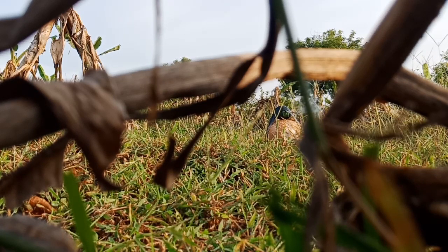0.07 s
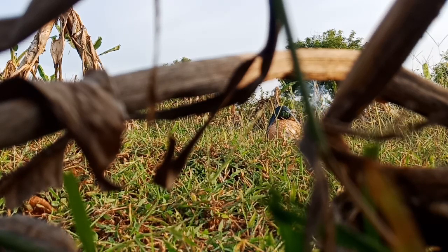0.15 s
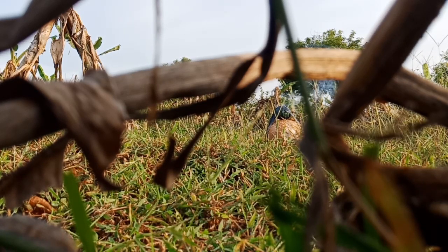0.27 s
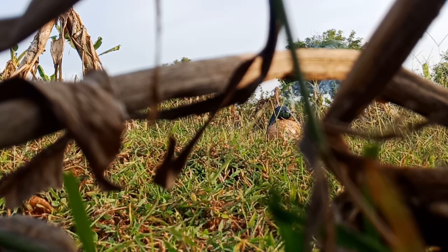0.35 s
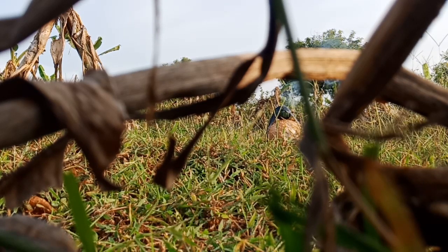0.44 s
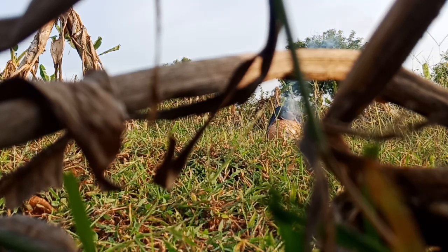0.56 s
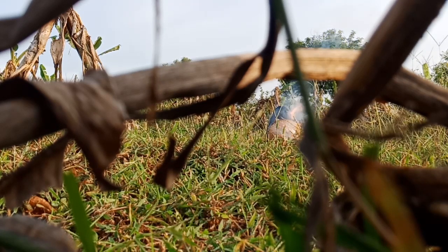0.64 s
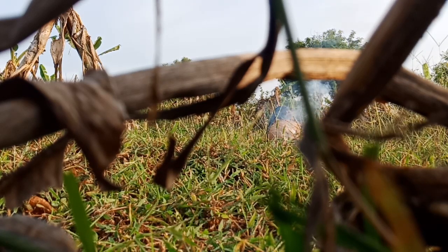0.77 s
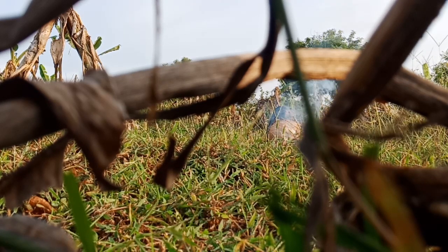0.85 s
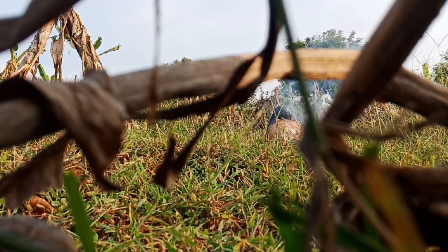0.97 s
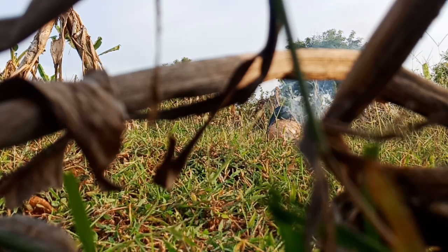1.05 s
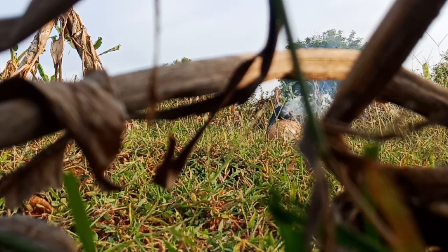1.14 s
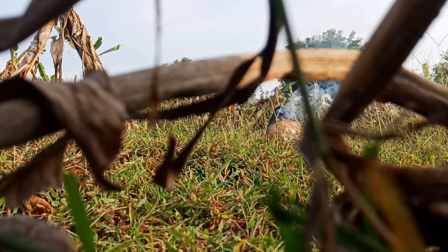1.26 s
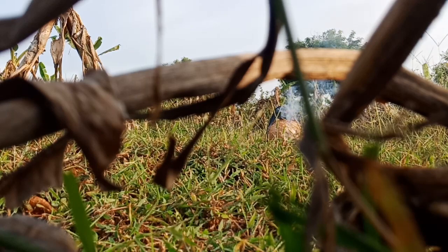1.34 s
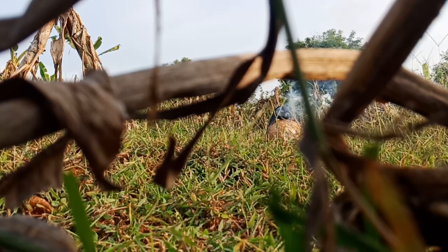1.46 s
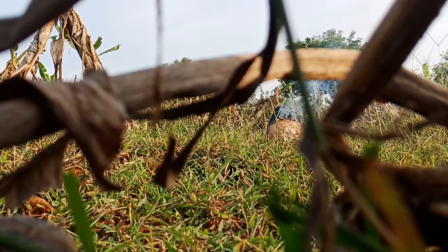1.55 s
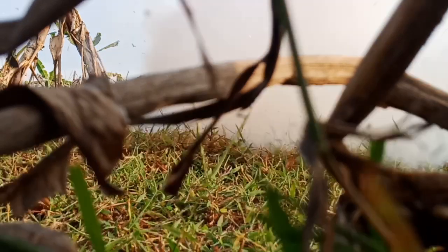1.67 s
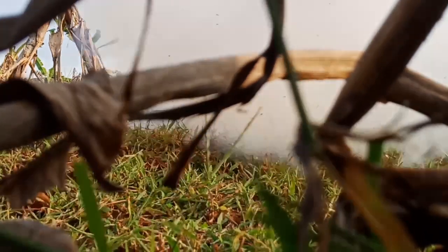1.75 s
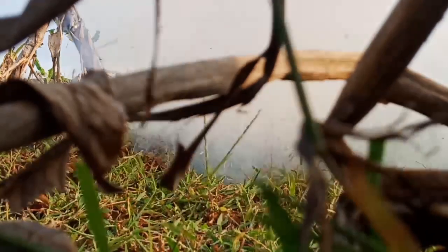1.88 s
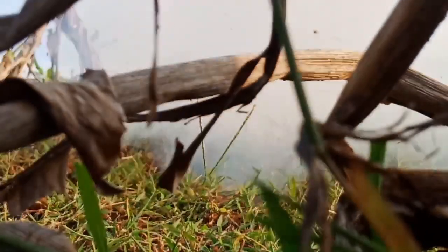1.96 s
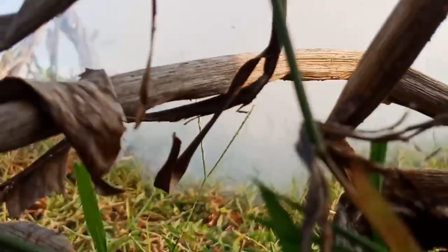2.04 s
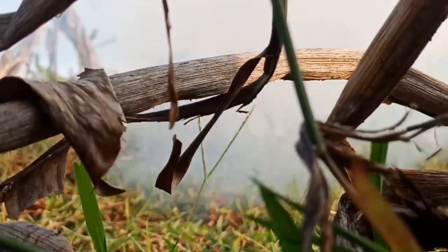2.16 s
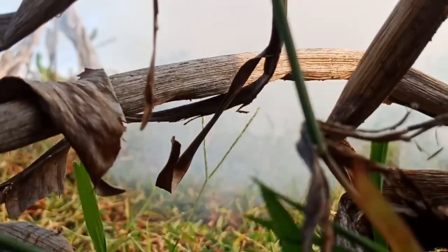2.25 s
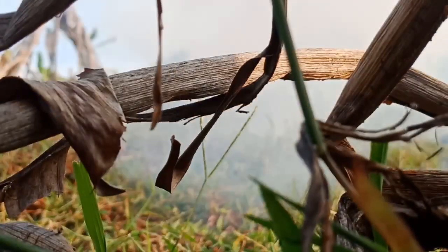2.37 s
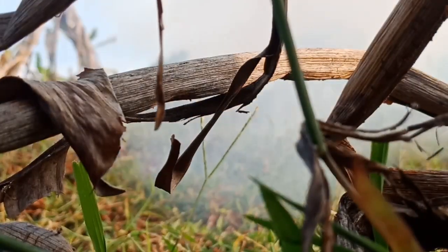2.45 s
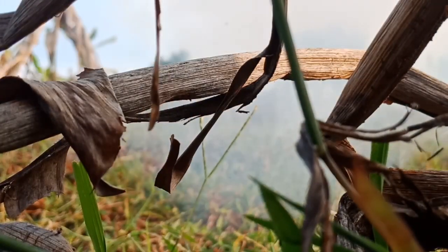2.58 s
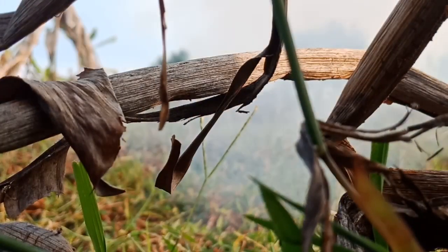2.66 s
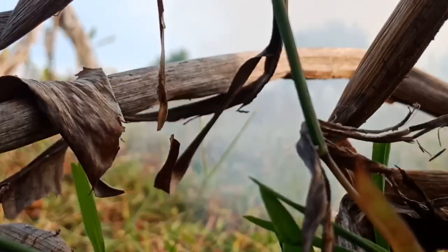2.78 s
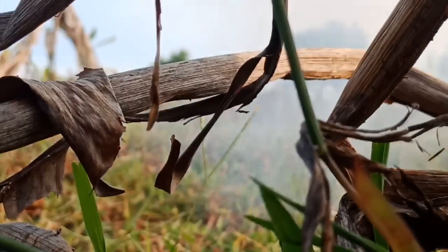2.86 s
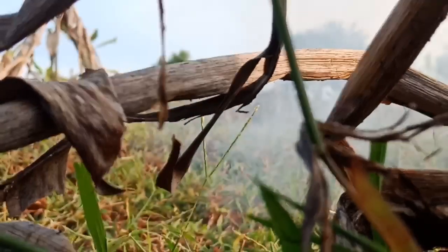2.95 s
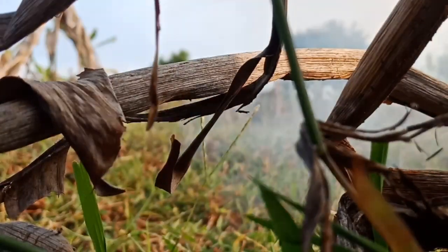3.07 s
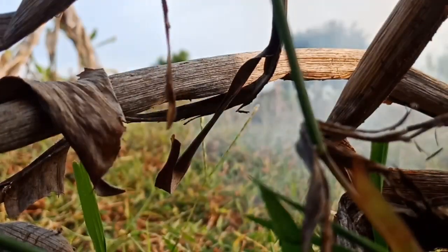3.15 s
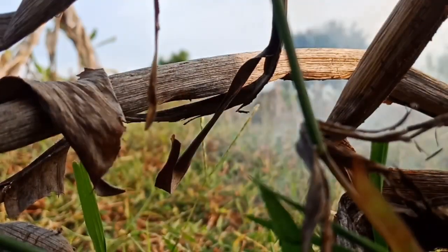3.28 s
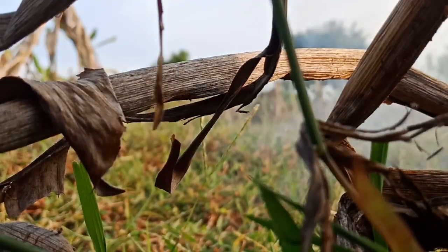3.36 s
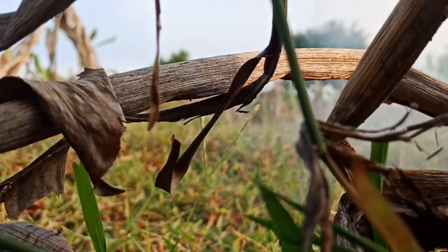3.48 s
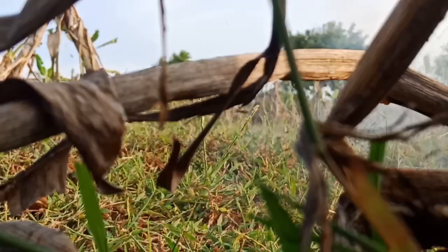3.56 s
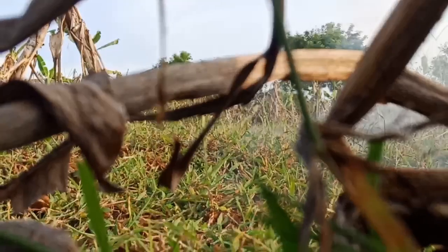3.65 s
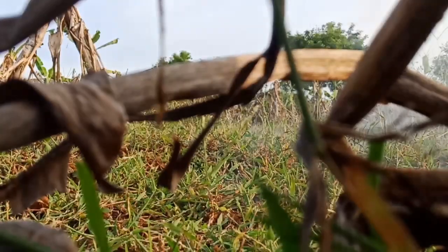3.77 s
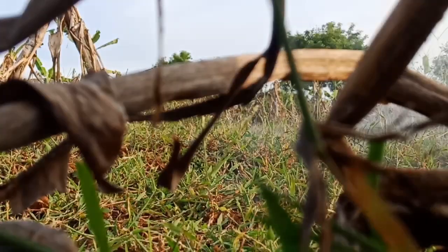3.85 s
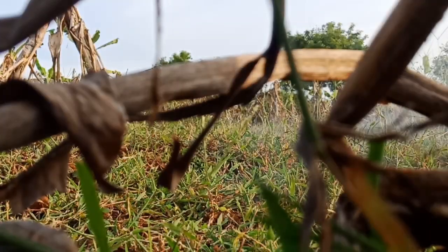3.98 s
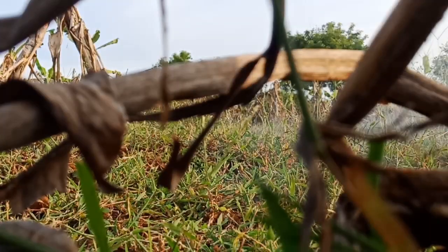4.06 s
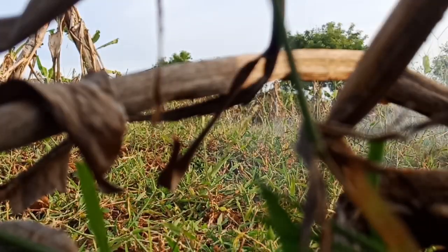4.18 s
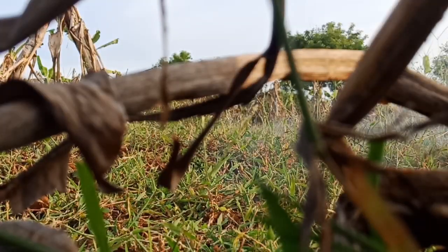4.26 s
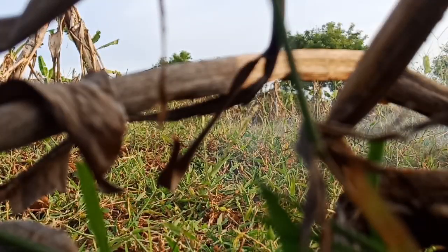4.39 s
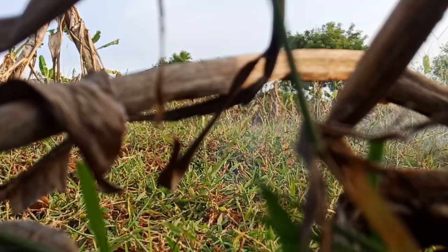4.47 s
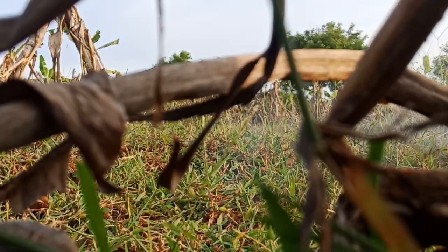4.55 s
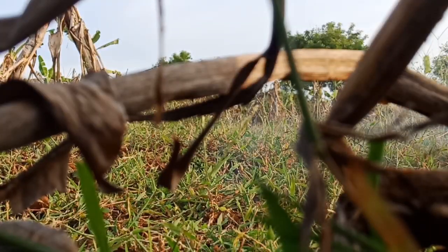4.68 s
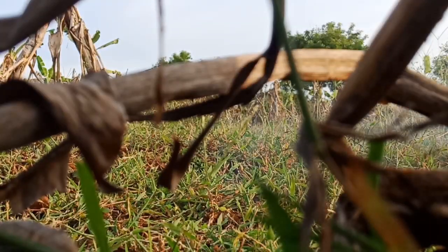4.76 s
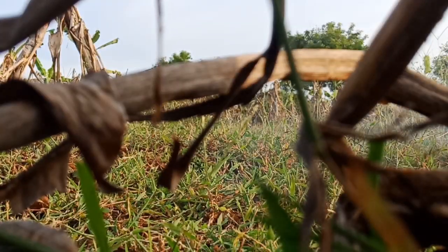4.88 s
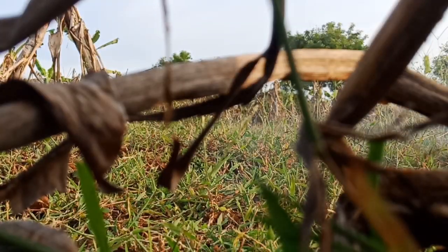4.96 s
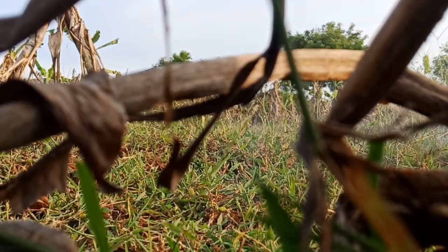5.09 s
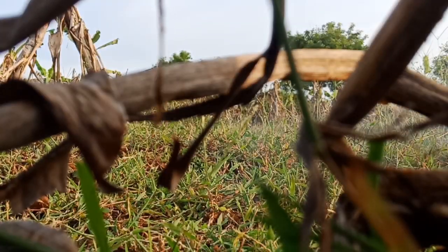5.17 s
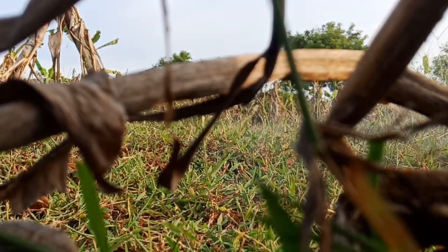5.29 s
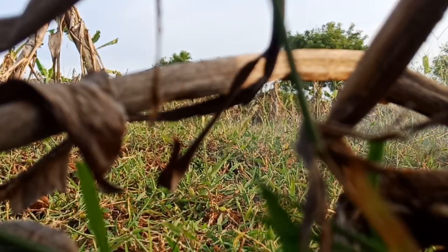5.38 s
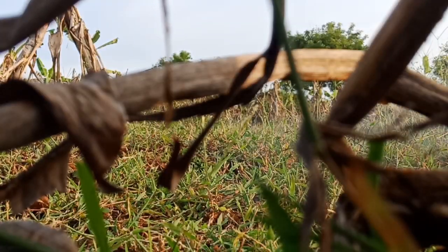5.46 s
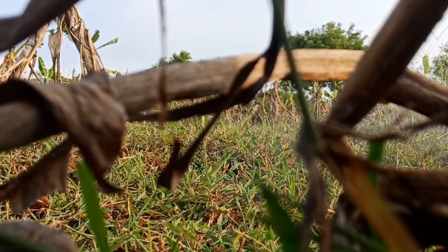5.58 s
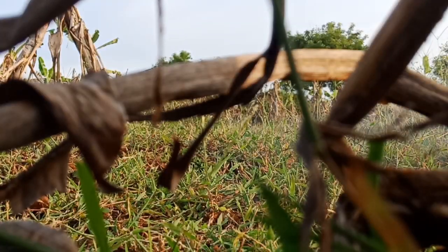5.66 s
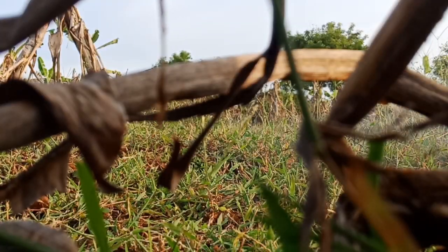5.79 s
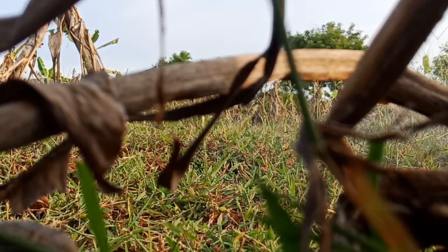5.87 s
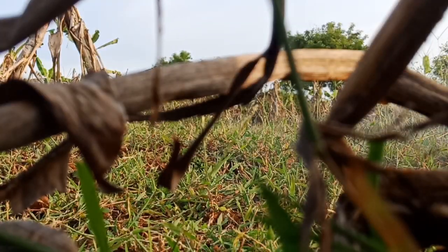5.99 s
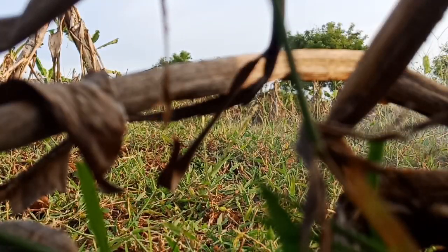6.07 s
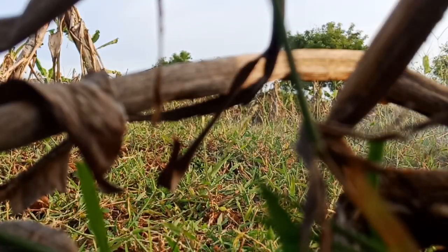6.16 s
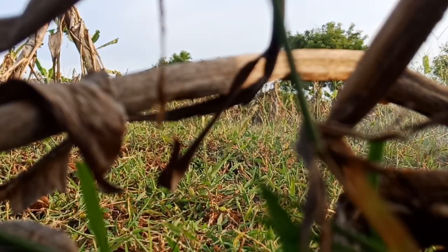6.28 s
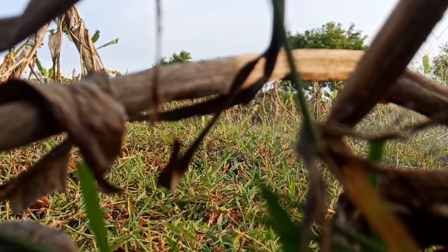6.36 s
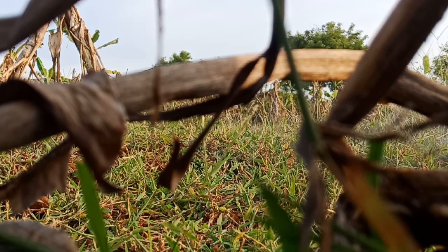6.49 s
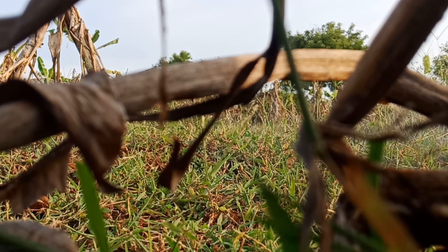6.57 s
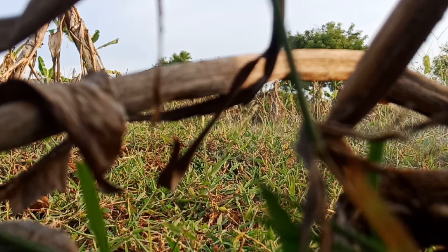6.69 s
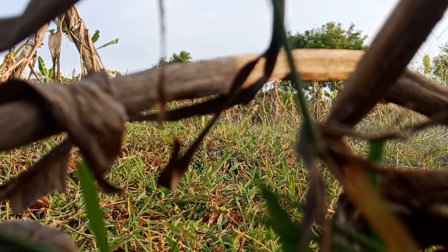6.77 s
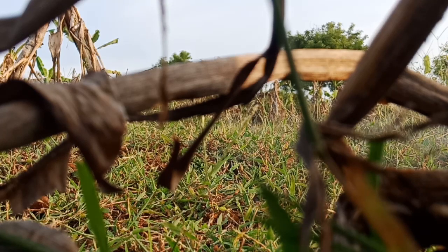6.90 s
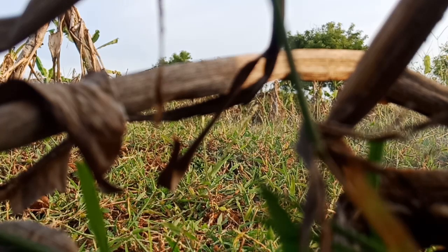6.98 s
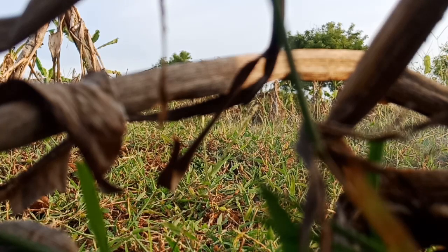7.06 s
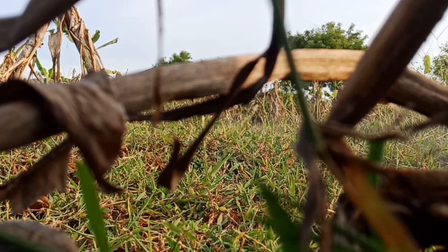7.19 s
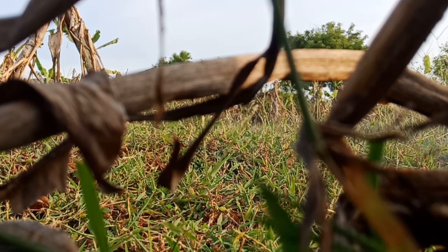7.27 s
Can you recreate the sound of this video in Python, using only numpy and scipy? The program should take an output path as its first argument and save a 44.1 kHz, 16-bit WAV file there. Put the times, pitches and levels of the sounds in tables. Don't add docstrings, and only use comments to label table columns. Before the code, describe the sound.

Very quiet open country: soft grass rustle and faint low engine drone. A burning fuse spits gritty little hisses at about 0.15, 0.6, strongest at 0.7, then 1.4 and 1.7 s. The background ducks briefly, and at 1.74 s a firecracker a few metres away bursts, a sharp crack and dense midrange roar saturating the phone microphone for under a tenth of a second. Distinct echoes tumble back from trees and hills until about 2.6 s, getting duller and weaker, while grit hisses and scraps tick on dry leaves, sparse stragglers lasting to 4 s. From 3.5 to 5.4 s a bird gives eight pure whistles, each dipping then swooping up, climbing from around 1.2 to 1.6 kHz and growing louder. A dull distant knock falls at 5.1 s; faint far calls and tiny ticks dot the quiet ending near 7 s. Faint metallic mirror tones edge everything.

```python
import sys
import numpy as np
from scipy import signal
from scipy.fft import rfft, irfft, next_fast_len
from scipy.io import wavfile
from scipy.ndimage import uniform_filter1d

SR = 44100
rng = np.random.default_rng(int(sys.argv[2]) if len(sys.argv) > 2 else 0)


def boost_factor(decibels):
    exponent = np.asarray(decibels, float) / 20
    return 10 ** exponent


def inscribe(sig):
    pcm = np.round(np.clip(np.atleast_2d(sig).T, -1, 1) * 32767)
    wavfile.write(sys.argv[1], SR, pcm.astype(np.int16))


N = 323363
CLOCK = np.arange(N) / SR

BURST_S = 1.7438
# t/s, pressure [full scale]
GROUND_JOLT = [
    (1.731, 0),
    (1.735, -.012),
    (1.742, -.016),
    (1.7445, 0),
]
# f/Hz, level/dB [per Hz]
ROAR_SPECTRUM = [(20, -30.5), (50, -13), (120, -17), (210, 1), (300, -5.5), (450, 1.5), (620, -2),
                 (780, -8), (1050, -11.5), (1400, -24.5), (2500, -41.5), (6000, -120)]
# f/Hz, level/dB [per Hz]
CRACK_SPECTRUM = [(300, -40.5), (900, -2.5), (2200, 7.5), (4000, -4), (7000, -21.5), (15000, -31.5),
                  (20000, -48.5)]
LEAD_IN_DB, LEAD_IN_DB_S = -38, 3800.5
FIREBALL_DB, FIREBALL_HOLD_S, FIREBALL_FALL_DB_S, FIREBALL_KNEE_S = 9.5, 0.034, 619.5, 0.013
CRACK_DB, CRACK_FALL_DB_S = -0.5, 480

# f/Hz, level/dB [per Hz]
HILLS_SPECTRUM = [(20, -40), (55, -22), (90, -4), (125, 0.5), (155, -5), (220, -42.5), (500, -120)]
# f/Hz, level/dB [per Hz]
FAR_TREES_SPECTRUM = [(60, -120), (120, -21), (165, -3), (200, -0.5), (245, -9.5), (350, -39), (800, -120)]
# f/Hz, level/dB [per Hz]
HEDGE_SPECTRUM = [(100, -120), (190, -19.5), (250, -2), (300, -1.5), (390, -7), (560, -40), (1200, -120)]
# f/Hz, level/dB [per Hz]
NEAR_TREES_SPECTRUM = [(150, -120), (330, -18), (430, 5), (620, 0), (780, -7), (950, -12), (1300, -26.5),
                       (3000, -120)]
# f/Hz, correlation [-1..1]
ROLL_ALIKE = [(60, 0.99), (180, 0.8), (550, 0.55), (1650, -0.54), (4970, 0.55), (15000, 0.35)]
# level/dB, fall [dB/s]
REFLECTORS = [
    (-28.5, 20.5),
    (-22.5, 40),
    (-19.5, 51),
    (-30, 40.5),
]
# t/s, hold [s], level/dB, nearness [0 hills .. 3 near trees]
RETURNS = [(1.801, 0.02, -9.5, 2), (1.85, 0.01, -19, 3), (1.897, 0.059, -22, 2),
           (1.953, 0.067, -20.5, 1.49), (1.96, 0.04, -33, 4.5), (2.02, 0.035, -26, 1.5),
           (1.967, 0.081, -24, 2.5), (2.11, 0.04, -35.5, 3), (2.084, 0.046, -19, 1),
           (2.17, 0.039, -31, 2.5), (2.196, 0.033, -24.5, 0.58), (2.239, 0.008, -33.5, 2.5),
           (2.304, 0.014, -25, 0.8), (2.308, 0.035, -35, 4), (2.375, 0.017, -44, 2),
           (2.451, 0.02, -27.5, -0.5), (2.51, 0.011, -35.5, -0.5), (2.578, 0.015, -36.5, -0.3),
           (2.722, 0.066, -47.5, 4), (2.816, 0.05, -50.5, 3.5), (2.761, 0.15, -55.5, 1),
           (2.687, 0.01, -48, -1), (2.809, 0.073, -44, 0.1), (2.956, 0.058, -58.5, 3.5),
           (3.084, 0.052, -54.5, 1.5), (3.36, 0.094, -57.5, 0), (3.6, 0.1, -64, 0.5),
           (3.748, 0.01, -56, -0.7), (3.88, 0.08, -65.5, 1)]
HAZE_DB, HAZE_FALL_DB_S = -28, 11.5
RETURN_RISE_DB_S, RETURN_FALL_DB_S = 450, 260
SPILL_DB = 11

# f/Hz, level/dB [per Hz]
GRIT_SPECTRUM = [(650, -41.5), (1100, -10), (1460, -2.5), (1650, -7.5), (2010, -3), (2440, -8.5),
                 (3190, -0.5), (5100, -21.5), (5460, -34.5), (7300, -26), (9240, -37), (15100, -35),
                 (16000, -33.5)]
# t/s, hold [s], level/dB
SHOWERS = [(1.785, 0.009, -30.5), (1.89, 0.0075, -38), (1.955, 0.1, -34), (2.18, 0.01, -42.5),
           (2.24, 0.011, -43.5), (2.3, 0.05, -52), (2.72, 0.15, -65)]
# t/s, peak level/dB, leaf f/Hz, left-right level/dB
SCRAPS = [(1.844, -37.5, 2520, 6), (1.8773, -29.5, 3370, -4), (1.903, -28, 2750, -7.5),
          (2.0147, -33, 2600, -1), (2.1366, -28.5, 3700, -14), (2.1492, -26, 2350, 7),
          (2.1716, -33.5, 3580, -7), (2.1965, -28, 2970, -9), (2.2278, -38, 3770, -7),
          (2.238, -30, 3450, 6), (2.2535, -31, 2740, 4), (2.294, -44, 3600, -15), (2.3035, -36, 3720, -3),
          (2.3258, -50, 2950, -1.5), (2.352, -40, 2640, -13), (2.425, -45, 3710, -3),
          (2.4912, -50, 2600, -8.5), (2.534, -48.5, 2930, -4), (2.593, -44, 3770, -4.5),
          (2.6668, -52.5, 2600, -5), (2.6847, -48, 3340, -1.5), (2.7674, -54, 3090, -5),
          (2.776, -46, 3110, -1), (2.894, -48, 3980, -13), (3.3083, -52.5, 2360, 4),
          (3.83, -52.5, 4050, -11), (3.9275, -47.5, 2560, 7), (4.0055, -45.5, 3990, -13),
          (6.838, -53.5, 3000, 3)]
# t/s, peak level/dB, leaf f/Hz, left-right level/dB
PINGS = [(1.9554, -39, 3100, 4), (2.4627, -44, 4310, -8), (3.479, -45.5, 3630, 13.5),
         (6.552, -70, 4400, -3), (6.657, -65, 2780, -9), (6.668, -68, 2510, -3)]
SHOWER_RISE_DB_S, SHOWER_FALL_DB_S = 300.5, 251
DRIZZLE_DB, DRIZZLE_FALL_DB_S = -46, 24.5
SLACK_LEAF, TAUT_LEAF = (0.019, -6.5), (0.015, 10.3)  # (t60 s, ring over snap dB)
PORT_HZ = 7180

# f/Hz, level/dB [per Hz]
JET_SPECTRUM = [(60, -29), (200, -8), (400, -1.5), (650, -2), (1120, -10), (2100, -11), (2900, -17),
                (3500, -31), (4050, -18), (4700, -36.5), (8000, -39), (15000, -55), (22000, -120)]
# f/Hz, correlation [-1..1]
JET_ALIKE = [(60, 0.83), (380, 0.99), (2380, 0.9), (15000, 0.25)]
# t/s, hold [s], level/dB, brightness [dB]
SPURTS = [(0.148, 0.0085, -60, -7), (0.217, 0.09, -66.5, -9), (0.591, 0.089, -50.5, 3),
          (0.71, 0.039, -41.5, -2.5), (0.848, 0.27, -67, -6.5), (1.355, 0.03, -70, -7),
          (1.424, 0.023, -59.5, -2), (1.684, 0.028, -47, 2)]
SPURT_RISE_DB_S, SPURT_FALL_DB_S = 649.5, 230.5

# peak t/s, lead from the opening hump [s], hump f/Hz, dip f/Hz, peak f/Hz
NOTES = [(3.518, 0.055, 880, 936, 1233), (3.741, 0.088, 1128, 940, 1368), (3.998, 0.099, 1216, 1055, 1444),
         (4.259, 0.1, 1272, 1150, 1493), (4.53, 0.11, 1353, 1211, 1526), (4.808, 0.118, 1376, 1274, 1583),
         (5.098, 0.11, 1432, 1294, 1591), (5.378, 0.11, 1462, 1306, 1594)]
# f/Hz, level/dB
EFFORT = [(900, -72), (1150, -61), (1300, -54), (1450, -43.5), (1600, -34.5)]
# f/Hz, left-right level/dB
BIRD_PAN = [(950, 20), (1180, 12), (1330, -6.5), (1450, -3.5), (1580, -.5)]
ONSET_S, SCOOP = 0.019, 0.92
DIP_AT = 0.506
DROP_S, DROP, FADE_S, LAST = 0.061, 0.72, 0.08, 0.67
EDGE_DB, PEAK_DB, DROP_DB = -11.5, 0.5, -0.5

# t/s, length [s], start f/Hz, end f/Hz, level/dB
FAR_CALLS = [(4.637, 0.066, 830, 820, -67), (4.9, 0.15, 756, 716, -66), (5.932, 0.18, 1875, 1820, -72),
             (5.971, 0.025, 510, 492, -59), (6.219, 0.085, 858, 726, -63), (6.406, 0.29, 331.4, 352, -67),
             (6.591, 0.036, 3620, 3750, -62), (6.596, 0.025, 2780, 2700, -67)]
# t/s, level/dB, t60 [s]
THUD = [
    (5.138, -47, 0.055),
    (5.141, -54, 0.75),
]
# f/Hz, level/dB [per Hz]
KNOCK_SPECTRUM = [(100, -120), (200, -4.5), (300, -4.5), (500, 0), (850, -5.5), (1100, -33), (2000, -120)]
# f/Hz, level/dB [per Hz]
RUSTLE_SPECTRUM = [(59, -29.5), (100, -1), (206, -5), (513, -5.5), (621, -8.5), (721, -8), (1360, -12.5),
                   (3620, -18), (4770, -30), (13800, -36), (16000, -42.5)]
# f/Hz, level/dB [per Hz]
RUMBLE_SPECTRUM = [(15, -49), (30, -22), (45, -6.5), (60, 0), (80, -8), (110, -18), (200, -61.5)]
# f/Hz, correlation [-1..1]
FIELD_ALIKE = [(60, 0.48), (380, -0.04), (2380, -0.03), (15000, 0.0)]
# f/Hz, left-right level/dB
FIELD_PAN = [(60, -0.5), (380, -1), (2380, -1), (15000, 5.5)]
DRONE_HZ = 60.4
RUMBLE_DB, RUMBLE_GROWS_DB_S, RUSTLE_DB, RUSTLE_GROWS_DB_S = -68, 0.26, -61.5, 0.2

# t/s, level/dB
DUCK = [
    (1.716, 0.5),
    (1.724, -15),
    (1.742, -17.5),
    (1.7435, 1),
]
CEILING, LOW_CUT_HZ = 0.97, 28
SLIP_HZ = 3889.7


def unit(x):
    return x / np.sqrt(np.mean(x ** 2) + 1e-20)


def along(points, hz):
    f, v = np.transpose(points)
    return np.interp(np.log(hz + 1), np.log(f + 1), v)


def curve(points):
    s, v = np.transpose(points)
    return np.interp(CLOCK, s, v)


def filtered(x, response):
    m = next_fast_len(N + SR // 2)
    return irfft(rfft(x, m) * response(np.fft.rfftfreq(m, 1 / SR)), m)[..., :N]


def rush(spectrum, alike, patchy_db, grain_db=0):
    grain = rng.exponential(size=N // 32 + 1).repeat(32)[:N]
    white = rng.standard_normal((2, N)) * boost_factor(grain_db * grain)
    z = signal.stft(white, nperseg=512)[2]
    patches = uniform_filter1d(rng.standard_normal(z.shape[1:]), size=5, axis=0)
    patches = uniform_filter1d(patches, size=6, axis=1)
    pair = signal.istft(z * boost_factor(patchy_db * unit(patches)), nperseg=512)[1][:, :N]

    def mid_side(hz):
        turn = np.arccos(np.clip(along(alike, hz), -1, 1)) / 2
        return boost_factor(along(spectrum, hz)) * [np.cos(turn), np.sin(turn)]

    mid, side = filtered(pair, mid_side)
    return unit(np.array([mid + side, mid - side]))


def sides(pan_db):
    return boost_factor(np.array([pan_db / 2, -pan_db / 2]))


def swells(rows, rise_db_s, fall_db_s, weight_db=0):
    s, hold, db = np.transpose(rows)[:3, :, None]
    t = np.arange(0, N, 32) / SR
    rise = rise_db_s * np.clip(s - t, 0, 9)
    fall = fall_db_s * np.clip(t - s - hold, 0, 9)
    power = boost_factor(db + weight_db - rise - fall) ** 2
    return np.interp(CLOCK, t, np.sqrt(power.sum(axis=0)))


def since_burst():
    return CLOCK - BURST_S


def blast():
    t = since_burst()
    u = np.clip(t, 0, 1) / 0.00067
    shock = boost_factor(15) * (1 - np.exp(-2.5 * u)) * (1 - u) * np.exp(-u)
    lead = boost_factor(LEAD_IN_DB + LEAD_IN_DB_S * np.minimum(t, 0)) * (t < 0)
    front = np.clip(t / 0.0012, 0, 1) ** 2
    spent_s = FIREBALL_KNEE_S * np.logaddexp(0, (t - FIREBALL_HOLD_S) / FIREBALL_KNEE_S)
    roar_gain = lead + front * boost_factor(FIREBALL_DB - FIREBALL_FALL_DB_S * spent_s)
    crack_gain = lead + front * boost_factor(CRACK_DB - CRACK_FALL_DB_S * abs(t))
    roar = roar_gain * rush(ROAR_SPECTRUM, ROLL_ALIKE, patchy_db=1.0)
    crack = crack_gain * rush(CRACK_SPECTRUM, [(1000, -.1)], patchy_db=2.0, grain_db=0.9)
    return curve(GROUND_JOLT) + shock + roar + crack


def echoes():
    t = since_burst()
    nearness = np.transpose(RETURNS)[-1][:, None]
    colours = (HILLS_SPECTRUM, FAR_TREES_SPECTRUM, HEDGE_SPECTRUM, NEAR_TREES_SPECTRUM)
    out = np.zeros((2, N))
    for kind, (colour, (db, fall_db_s)) in enumerate(zip(colours, REFLECTORS)):
        haze = boost_factor(HAZE_DB - HAZE_FALL_DB_S * abs(t))
        roll = boost_factor(db) * (boost_factor(-fall_db_s * abs(t)) + haze)
        spill_db = -SPILL_DB * (nearness - kind) ** 2
        returns = swells(RETURNS, RETURN_RISE_DB_S, RETURN_FALL_DB_S, spill_db)
        out += np.hypot(roll, returns) * rush(colour, ROLL_ALIKE, patchy_db=1.0, grain_db=1.0)
    return np.clip(t / 0.075, 0, 1) * out


def grit():
    t = since_burst()
    clumps = swells(SHOWERS, SHOWER_RISE_DB_S, SHOWER_FALL_DB_S)
    drizzle = boost_factor(DRIZZLE_DB - DRIZZLE_FALL_DB_S * abs(t))
    hiss = rush(GRIT_SPECTRUM, ROLL_ALIKE, patchy_db=2.0, grain_db=1.5)
    return (t > .03) * np.hypot(clumps, drizzle) * hiss


def scraps():
    out = np.zeros((2, N))
    t = np.arange(2000) / SR
    band = signal.butter(3, [1500, 4500], "band", fs=SR, output="sos")
    hits = [(*row, *SLACK_LEAF) for row in SCRAPS] + [(*row, *TAUT_LEAF) for row in PINGS]
    for s, db, hz, pan_db, t60, ring_db in hits:
        noise = rng.standard_normal((2, len(t)))
        leaf_phase, port_phase = noise[:, :1], 2 * noise[:, 1:2]
        fall = boost_factor(-60 * t / t60)
        leaf = np.sin(2 * np.pi * hz * t + leaf_phase)
        port = 0.32 * fall * np.sin(2 * np.pi * PORT_HZ * t + port_phase)
        ring = fall * (1 - np.exp(-t / 0.000091)) * (leaf + port)
        snap = signal.sosfilt(band, noise * fall ** 1.45 * (1 - np.exp(-t / 0.00025)))
        hit = boost_factor(ring_db) * ring + snap / abs(snap).max(axis=1, keepdims=True)
        start = round(s * SR)
        out[:, start:start + len(t)] += boost_factor(db + 1.5) * sides(pan_db)[:, None] * hit
    return out


def fuse():
    jet = rush(JET_SPECTRUM, JET_ALIKE, patchy_db=0.0, grain_db=1.5)
    low = filtered(jet, lambda hz: 1 / (1 + (hz / 1200) ** 2))
    tilt_db = np.transpose(SPURTS)[-1][:, None]
    dull = swells(SPURTS, SPURT_RISE_DB_S, SPURT_FALL_DB_S, -tilt_db)
    bright = swells(SPURTS, SPURT_RISE_DB_S, SPURT_FALL_DB_S, tilt_db)
    return (since_burst() < 0) * (dull * low + bright * (jet - low))


def whistle():
    song = np.zeros(N)
    for peak_s, lead, hump_hz, dip_hz, peak_hz in NOTES:
        s = peak_s + np.array([-lead - ONSET_S, -lead, -DIP_AT * lead, 0, DROP_S, FADE_S])
        hz = np.array([SCOOP * hump_hz, hump_hz, dip_hz, peak_hz, DROP * peak_hz, LAST * peak_hz])
        db = along(EFFORT, hz) + [EDGE_DB, 0, 0, PEAK_DB, DROP_DB, EDGE_DB]
        turns = np.arange(len(s))
        step = np.interp(CLOCK, s, turns)
        eased = step - 0.5 * np.sin(2 * np.pi * step) / (2 * np.pi)
        pitch = np.interp(eased, turns, hz)
        level = np.interp(eased, turns, db)
        sounding = (CLOCK > s[0]) * (CLOCK < s[-1])
        song += np.sqrt(2) * boost_factor(level) * sounding * np.sin(2 * np.pi * np.cumsum(pitch) / SR)
    return song


def bird():
    song = whistle()
    t = np.arange(SR // 3) / SR
    clear_answer = 1 + 1.7 * (abs(t - .08) < .01)
    tail = rng.standard_normal((2, len(t))) * boost_factor(-60 * t / 0.2) * (t > .02) * clear_answer
    echo = signal.fftconvolve(song[None], tail / np.linalg.norm(tail[0]), axes=1)[:, :N]

    def ports(hz):
        lag = np.exp(1j * np.pi * hz * 0.00011 * np.array([[-1], [1]]))
        return sides(along(BIRD_PAN, hz)) * lag

    return filtered(song, ports) + boost_factor(-15.0) * echo


def far_birds():
    out = np.zeros(N)
    for s, length, start_hz, end_hz, db in FAR_CALLS:
        count = round(length * SR)
        u = np.arange(count) / count
        phase = 2 * np.pi * np.cumsum(start_hz + (end_hz - start_hz) * u) / SR
        start = round(s * SR)
        out[start:start + count] += boost_factor(db) * np.sin(np.pi * u) * np.sin(phase)
    return out


def thud():
    gain = np.zeros(N)
    for s, db, t60 in THUD:
        attack = np.clip((CLOCK - s) / 0.0018, 0, 1)
        gain += attack * boost_factor(db - 60 * np.clip(CLOCK - s, 0, 2) / t60)
    return gain * rush(KNOCK_SPECTRUM, [(500, 0.9)], patchy_db=4.0)


def field():
    drift = np.cumsum(rng.standard_normal(N)) * 0.0054
    drone = boost_factor(-3) * np.sin(2 * np.pi * DRONE_HZ * CLOCK + drift)
    engines = drone + rush(RUMBLE_SPECTRUM, [(60, 0.43)], patchy_db=1.18)
    rumble = boost_factor(RUMBLE_DB + RUMBLE_GROWS_DB_S * CLOCK) * engines
    stalks = rush(RUSTLE_SPECTRUM, FIELD_ALIKE, patchy_db=0.8)
    rustle = boost_factor(RUSTLE_DB + RUSTLE_GROWS_DB_S * CLOCK) * stalks
    return filtered(rumble + rustle, lambda hz: sides(along(FIELD_PAN, hz)))


def scene():
    burst = blast() + echoes() + grit() + scraps()
    surroundings = fuse() + bird() + far_birds() + thud() + field()
    return burst + surroundings * boost_factor(curve(DUCK))


def roll_off(x):
    return signal.sosfilt(signal.butter(12, 16340, fs=SR, output="sos"), x)


def record(dry):
    x = CEILING * dry / (1 + abs(dry) ** 3.5) ** (1 / 3.5)
    low_cut = signal.butter(2, LOW_CUT_HZ, "high", fs=SR, output="sos")
    x = signal.sosfilt(low_cut, x)
    slip = (np.arange(N) * SLIP_HZ / SR) % 1 - .5
    x = x + .92 * slip * np.gradient(x, axis=1)
    mix = filtered(x, lambda hz: np.clip((16100 - hz) / 500, 0, 1))
    return roll_off(mix)


dry = scene()
out = record(dry)
inscribe(out)
```